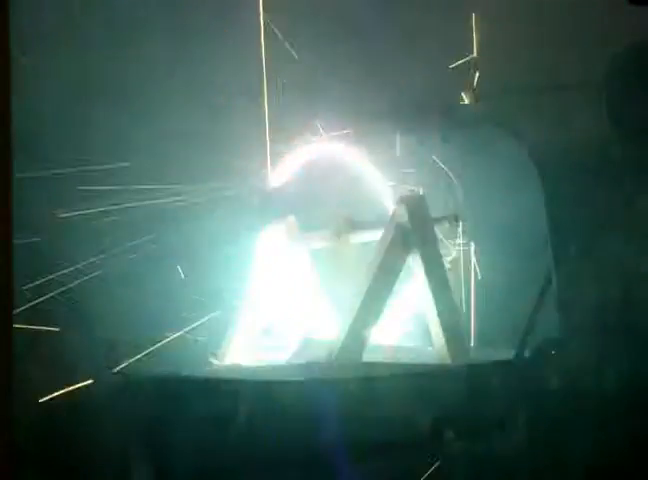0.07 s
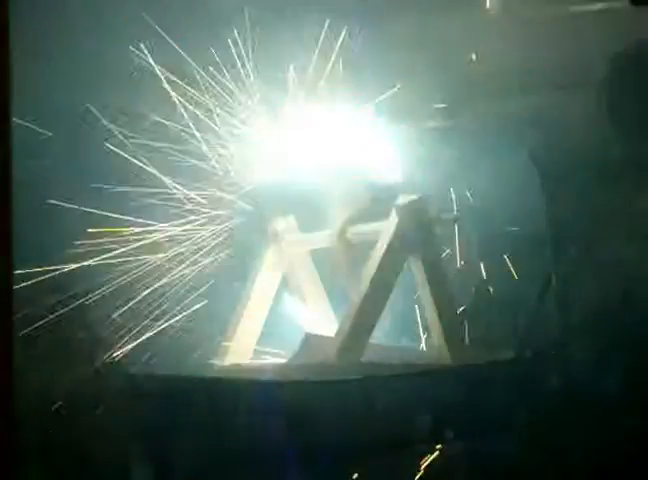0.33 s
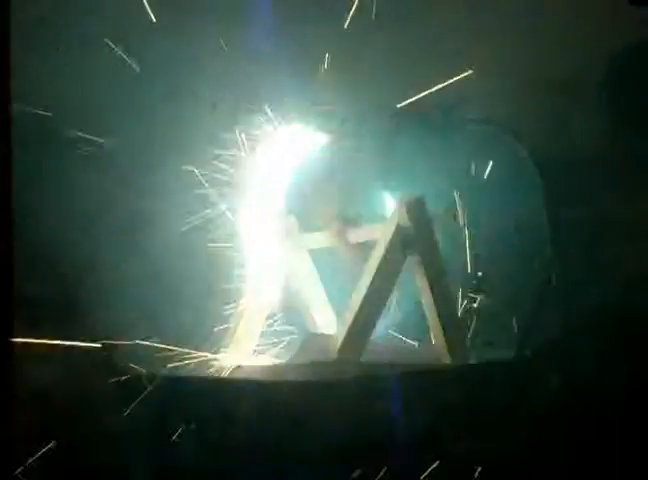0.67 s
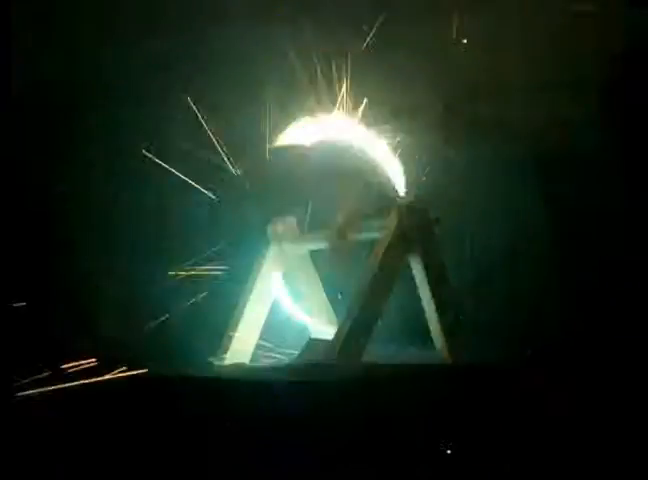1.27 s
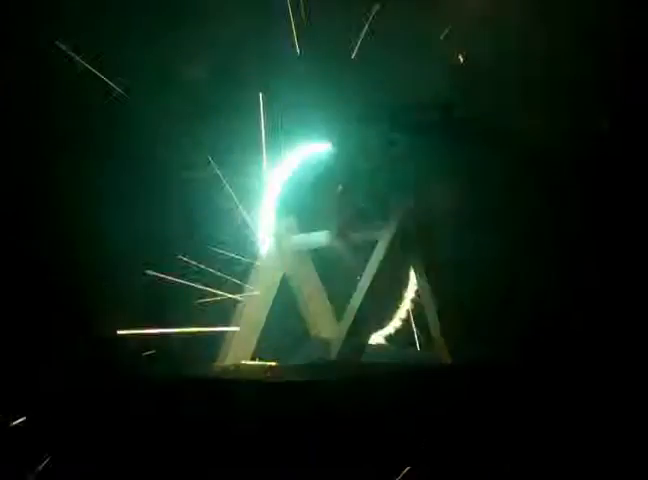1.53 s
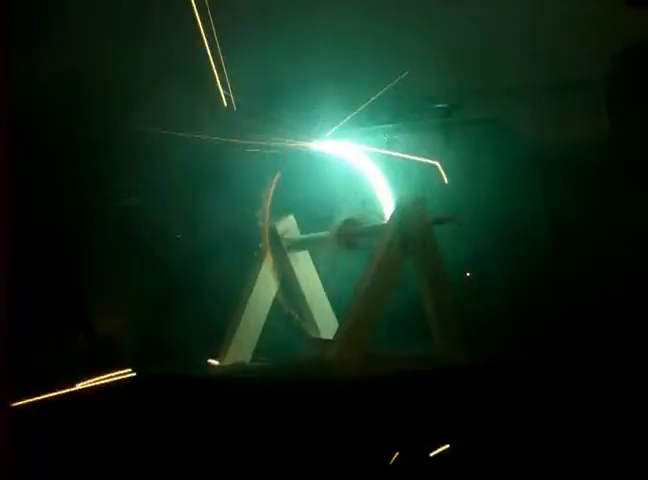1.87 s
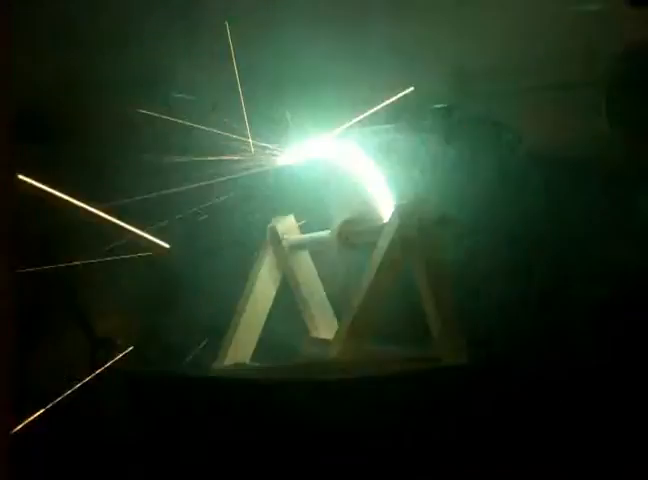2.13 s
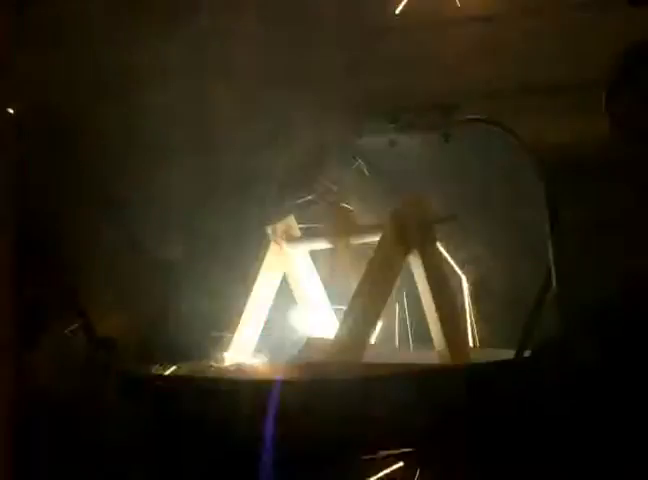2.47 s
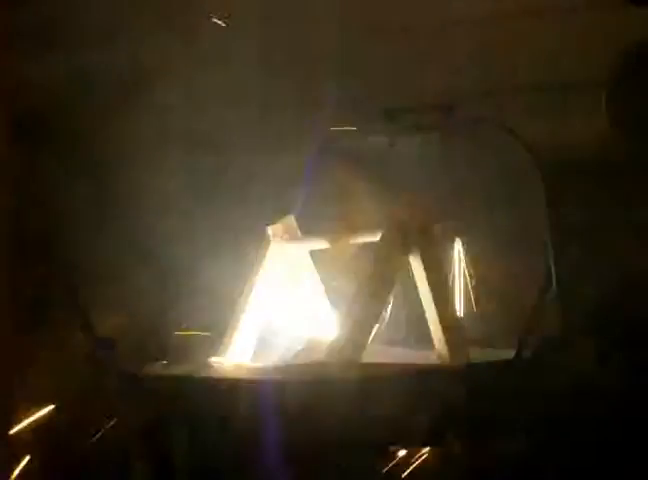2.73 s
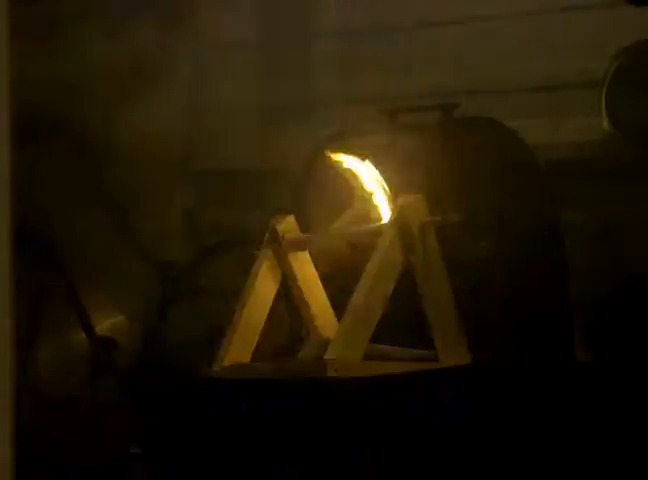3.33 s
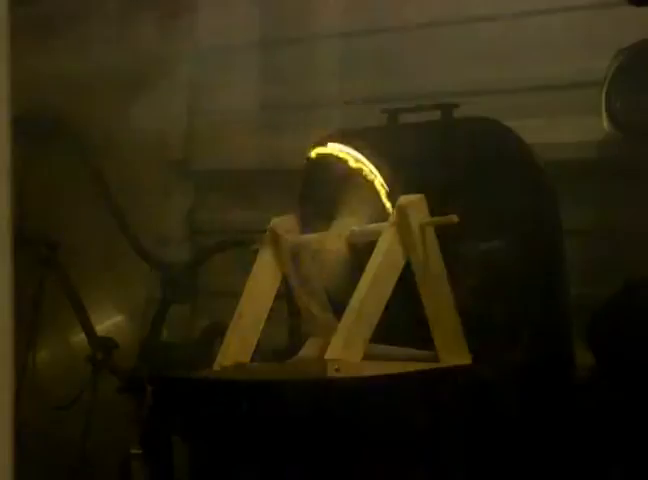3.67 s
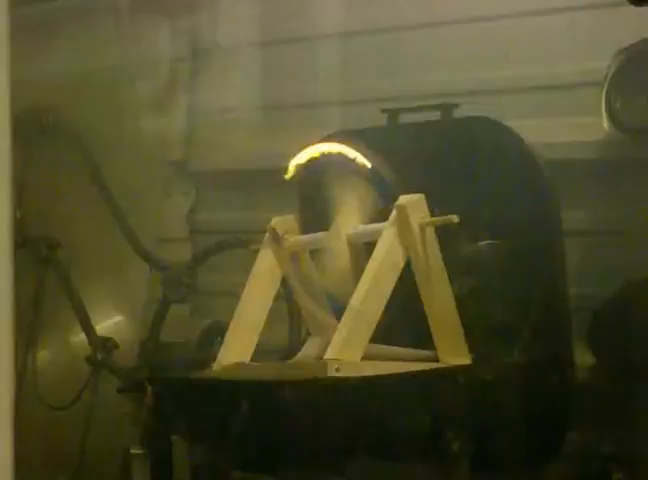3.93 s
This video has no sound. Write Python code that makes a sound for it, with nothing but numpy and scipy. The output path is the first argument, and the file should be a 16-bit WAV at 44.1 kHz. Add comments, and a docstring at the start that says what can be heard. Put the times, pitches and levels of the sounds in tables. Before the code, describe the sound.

A firework wheel hisses and spits from the start, close and slightly to the right, over a low workshop rumble. Dull knocks come ten to twenty times a second as it spins, and the burning tube rings hollow at first. The hiss swells near 1 second, sinks around 2, swells again near 2.8 and dies away by about 3.5, leaving a dull flickering flame and knocks until 4 seconds.

```python
"""A firework wheel spins on a wooden stand in a workshop, heard slightly from the right by two close microphone
ports. From the start its jet hisses over a low rumble, and dull knocks, probably the wheel chattering on its
axle, come ten to twenty times a second, many with a dry, bright tick. At first the burning tube also rings
hollow. The jet swells near 1 s, sinks, swells again near 2.8 s and burns out into a dull flame."""
import sys
import numpy as np
from scipy.fft import rfft, irfft, next_fast_len
from scipy.io import wavfile
from scipy.ndimage import map_coordinates

SR = 44100
rng = np.random.default_rng(int(sys.argv[2]) if len(sys.argv) > 2 else 0)


def master_out(mix):
    """Clip the mix to full scale and print it as 16-bit PCM to the path in sys.argv[1]."""
    frames = np.transpose(np.atleast_2d(mix))
    ceiling = np.clip(frames, -1, 1)
    pcm = np.round(ceiling * 32767).astype(np.int16)
    wavfile.write(sys.argv[1], SR, pcm)


N = 176400

# Levels in the tables are relative.
# spectrum of the rumble: f/Hz, level/dB
RUMBLE_SPECTRUM = [(12, -0.5), (20, 3), (45, -1.5), (120, -2), (250, -8), (500, -10.5), (1200, -31)]
# envelope of the rumble: t/s, level/dB
RUMBLE_ENVELOPE = [(0, -45.5), (1.2, -44.5), (2.2, -45), (3, -45.5), (4, -45.5)]
# hum lines, probably electrical: f/Hz, bandwidth/Hz, level/dB
HUM_LINES = [(105, 12, 0), (157.4, 6.8, -4), (197.6, 1.8, 0), (246, 5, -3), (302.3, 5, 2), (496, 14, -7)]
# spectrum of the flame: f/Hz, level/dB
FLAME_SPECTRUM = [(100, -14), (300, 0.5), (500, -3), (780, 1.5), (1050, -0.5), (1300, -1), (2500, -7.5),
                  (3900, -15.5), (4600, -14), (5600, -25), (7100, -17.5), (11000, -21), (15000, -37)]
# envelope of the flame, which falters once as the jet dies: t/s, level/dB
FLAME_ENVELOPE = [(0, -48), (1.1, -46.5), (2.2, -48), (3.2, -46.5), (3.39, -47), (3.46, -50), (3.54, -49),
                  (3.6, -46), (4, -47.5)]
# knocks of the wheel: t/s, level/dB, f/Hz
WHEEL_KNOCKS = [(0.016, -39, 200), (0.119, -38, 200), (0.179, -31.5, 280), (0.284, -32.5, 230),
                (0.381, -27, 200), (0.514, -36, 220), (0.57, -33, 270), (0.682, -33, 190),
                (0.718, -31.5, 240), (0.828, -33, 310), (0.858, -33, 240), (0.965, -36, 300),
                (1.025, -30.5, 300), (1.127, -30, 220), (1.177, -32.5, 220), (1.277, -32, 250),
                (1.324, -32.5, 230), (1.362, -34, 200), (1.421, -34, 170), (1.498, -33.5, 170),
                (1.604, -27.5, 190), (1.643, -34.5, 210), (1.799, -30.5, 220), (1.849, -35, 230),
                (1.912, -32.5, 240), (1.998, -33.5, 170), (2.096, -35.5, 230), (2.204, -33.5, 200),
                (2.298, -31, 180), (2.399, -35, 260), (2.438, -36, 240), (2.543, -37, 180),
                (2.686, -37, 150), (2.744, -39, 200), (2.795, -32, 200), (2.885, -34, 210),
                (2.934, -35, 240), (2.986, -34, 180), (3.084, -34, 280), (3.126, -37, 220),
                (3.198, -32, 180), (3.231, -35.5, 210), (3.39, -33, 230), (3.438, -40, 170),
                (3.519, -41, 160), (3.573, -34, 250), (3.674, -33, 180), (3.767, -31.5, 160),
                (3.874, -32, 210), (3.965, -36, 250)]
# spectrum of a knock's chatter: f/Hz, level/dB
CHATTER_SPECTRUM = [(20, -17), (45, -2), (130, -3), (300, -4), (550, -2), (1000, -7), (2000, -18),
                    (5000, -38), (15000, -60)]
# resonances of the tube: f/Hz, bandwidth/Hz, level/dB
TUBE_RESONANCES = [(1286, 28, 5.5), (1344, 36, 2), (1477, 60, -4.5), (1650, 34, 5), (1712, 36, 1.5)]
# envelope of the tube's ring before expansion: t/s, level/dB
TUBE_ENVELOPE = [(0, -46.5), (.3, -44.3), (.5, -40.5), (.72, -39), (.95, -41.6), (1.2, -41), (1.6, -45),
                 (2, -49), (2.5, -49), (2.95, -46.5), (3.5, -53), (4, -58)]
# surges of the ring: t/s, rise/dB
TUBE_SURGES = [(0.48, 1), (0.675, 2), (0.738, 4.5), (1.09, 2), (1.22, 3), (1.66, 8)]
# bright ticks, many landing on the knocks: t/s, level/dB
BRIGHT_TICKS = [(0.017, -35), (0.283, -29), (0.332, -32), (0.445, -38), (0.519, -31), (0.672, -25),
                (0.732, -33), (0.905, -29.5), (0.939, -32), (1.212, -32), (1.826, -30), (2.104, -28),
                (2.454, -35), (2.883, -32), (2.986, -32), (3.083, -30), (3.204, -31), (3.351, -34),
                (3.384, -37), (3.585, -34), (3.674, -36.5), (3.742, -40), (3.894, -39)]
# spectrum of a tick: f/Hz, level/dB
TICK_SPECTRUM = [(150, -11), (600, 0), (1700, 0.5), (4000, -19), (12000, -19)]
# envelope of the hiss, following the thrust: t/s, level/dB
JET_ENVELOPE = [(0, -37), (0.3, -35.5), (0.45, -34.7), (0.7, -34), (0.97, -34), (1.1, -33), (1.45, -36),
                (1.75, -38.5), (2.15, -40), (2.4, -38.5), (2.6, -37.5), (2.82, -35.5), (3.05, -40),
                (3.25, -43), (3.45, -49), (3.7, -55), (4, -63)]
# spectrum of the hiss: f/Hz, level/dB
HISS_SPECTRUM = [(100, -25), (400, -12), (780, -7.3), (1080, -9.6), (1950, -5.1), (2750, -6.0),
                 (3300, -4.9), (3850, 0.0), (4500, -3.2), (5000, -7.1), (5600, -10.0), (6300, -7.8),
                 (7100, -5.5), (7900, -12.4), (9400, -16.6), (10200, -20.3), (12200, -20.2), (13800, -17.2),
                 (15100, -12.6), (15600, -15.8)]
# narrow resonances within the hiss: f/Hz, bandwidth/Hz, level/dB
HISS_RESONANCES = [(2149, 90, -6), (2524, 70, -7), (2994, 50, -6), (3780, 90, -3), (3950, 70, 1),
                   (7076, 90, -4), (9370, 80, -15), (14970, 150, -11)]
# coherence of the two ports: f/Hz, coherence (0-1)
PORT_COHERENCE = [(60, .98), (500, .97), (2000, .92), (4000, .95), (5000, .998), (6100, .998), (7100, .87),
                  (8200, .58), (9700, .35), (10800, .68), (12500, .33), (15300, .86)]
# lag of the left port: f/Hz, phase/rad
LEFT_LAG = [(0, 0), (4000, 2.35), (5000, 3.05), (6200, 3.2), (9600, 5.3), (10100, 3.3), (12100, 3.1),
            (12700, 1.3), (15700, 3.1)]


def amp(db):
    """Amplitude ratio of a level in decibels."""
    return 10 ** (np.asarray(db) / 20)


def along(points, hz):
    """Interpolation of (f/Hz, value) points on a logarithmic frequency axis."""
    f, values = np.transpose(points)
    return np.interp(np.log(hz + 1), np.log(f + 1), values)


def envelope(points):
    """Linear interpolation of (t/s, value) points at every sample."""
    return np.interp(np.arange(N) / SR, *np.transpose(points))


def wobble(rate):
    """Slow random modulation: a spline through `rate` Gaussian values a second."""
    knots = rng.standard_normal(int(N * rate / SR) + 4)
    return map_coordinates(knots, [np.arange(N) * rate / SR])


def filtered(x, response):
    """Linear filtering: the spectrum is multiplied by a frequency response."""
    size = next_fast_len(N + SR // 2)
    hz = np.fft.rfftfreq(size, 1 / SR)
    return irfft(rfft(x, size) * response(hz), size)[..., :N]


def colour(points):
    """Magnitude response through (f/Hz, level/dB) points."""
    return lambda hz: amp(along(points, hz))


def resonances(modes):
    """Magnitude response of damped resonators whose powers add."""
    return lambda hz: np.sqrt(sum(
        np.abs(amp(db) * hz * width / (centre ** 2 - hz ** 2 + 1j * hz * width)) ** 2
        for centre, width, db in modes))


def spread(pair, response):
    """Partial coherence: two independent signals, filtered as mid and side, give stereo of rms 1."""
    def mid_side(hz):
        angle = np.arccos(np.clip(along(PORT_COHERENCE, hz), 0, 1)) / 2
        return response(hz) * np.array([np.cos(angle), np.sin(angle)])
    mid, side = filtered(pair, mid_side)
    stereo = np.array([mid + side, mid - side])
    return stereo / np.sqrt(np.mean(stereo ** 2) + 1e-20)


def noise(response):
    """Spectral shaping of white noise, in stereo at rms 1."""
    return spread(rng.standard_normal((2, N)), response)


def workshop():
    """Background noise: an amplitude-modulated rumble and a faint, steady narrow-band hum."""
    rumble = amp(envelope(RUMBLE_ENVELOPE) + 1.6 * wobble(40)) * noise(colour(RUMBLE_SPECTRUM))
    hum = amp(-55) * noise(resonances(HUM_LINES))
    return rumble + hum


def flame():
    """Combustion noise: a dull, flickering rush that outlasts the jet."""
    flicker_db = 1.27 * wobble(40) + 1.3 * wobble(150)
    return amp(envelope(FLAME_ENVELOPE) + flicker_db) * noise(colour(FLAME_SPECTRUM))


def knocks(decay_cycles=0.33, dip_lead_s=0.0053, dip_width_s=0.003, rise_s=0.0102, fall_s=0.0084):
    """Impact transients: a soft pressure dip, then a short pitched pop, inside a swell of chatter."""
    thumps, swell = np.zeros(N), np.zeros(N)
    for peak_s, db, hz in WHEEL_KNOCKS:
        t = np.arange(N) / SR - peak_s
        pop = amp(1.5) * np.cos(2 * np.pi * hz * t) * np.exp(-np.abs(t) * hz / decay_cycles)
        dip = amp(-9.5) * np.exp(-((t + dip_lead_s) / dip_width_s) ** 2)
        thumps += amp(db) * (pop - dip)
        swell += amp(db) * np.exp(-np.maximum(-t / rise_s, t / fall_s))
    chatter = amp(-9) * swell * noise(colour(CHATTER_SPECTRUM))
    return thumps + chatter


def tube(expansion=1.12, pivot_db=-46, surge_s=0.018):
    """Forced resonance: the jet drives the tube's modes, most at full burn and in short surges."""
    t = np.arange(N) / SR
    ring_db = pivot_db + expansion * (envelope(TUBE_ENVELOPE) - pivot_db)
    surge_db = sum(db * np.exp(-((t - peak_s) / surge_s) ** 2) for peak_s, db in TUBE_SURGES)
    flutter_db = 0.9 * wobble(44.54)
    return amp(ring_db + surge_db + flutter_db - 2.5) * noise(resonances(TUBE_RESONANCES))


def ticks(decay_s=0.0018):
    """Impulsive ticks: dry, bright clicks of abrupt onset and exponential decay, many of them on the knocks."""
    t = np.arange(N) / SR
    bursts = sum(amp(db) * (t > onset_s) * np.exp(-np.abs(t - onset_s) / decay_s)
                 for onset_s, db in BRIGHT_TICKS)
    return amp(-1) * bursts * noise(colour(TICK_SPECTRUM))


def jet(sparks_per_s=600, spark_spread_db=3.2, treble_hz=5000, treble_db_per_db=0.039):
    """Turbulence radiates a hiss, peppered with spark cracks; more thrust makes it louder and brighter."""
    thrust_db = envelope(JET_ENVELOPE)
    impulses = (rng.random((2, N)) < sparks_per_s / SR) * rng.choice([-1, 1], (2, N))
    spark_db = spark_spread_db * np.minimum(rng.exponential(size=(2, N)), 5)
    cracks = amp(-8.5) * spread(impulses * amp(spark_db), colour(HISS_SPECTRUM))
    hiss = noise(colour(HISS_SPECTRUM)) + amp(-9) * noise(resonances(HISS_RESONANCES)) + cracks
    treble = filtered(hiss, lambda hz: hz ** 4 / (hz ** 4 + treble_hz ** 4))
    treble_gain = amp(treble_db_per_db * (thrust_db - thrust_db.mean()))
    flutter_db = 0.78 * (wobble(24.99) + wobble(140))
    return (hiss + treble * (treble_gain - 1)) * amp(thrust_db + flutter_db)


def scene():
    """Superposition, with a phase difference: all sound reaches the right port just before the left."""
    def port_phase(hz):
        lag = np.interp(hz, *np.transpose(LEFT_LAG))
        return np.exp(0.5j * np.array([-lag, lag]))
    sound = jet() + tube() + ticks() + flame() + knocks() + workshop()
    return filtered(sound, port_phase)


def record(dry, low_hz=18, top_hz=15750):
    """Band limiting: a first-order roll-off of the deepest bass and a sharp cut of the highest treble."""
    return filtered(dry, lambda hz: (hz < top_hz) * hz / np.hypot(hz, low_hz))


dry = scene()
out = record(dry)
master_out(out)
```